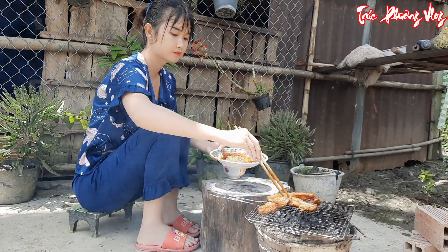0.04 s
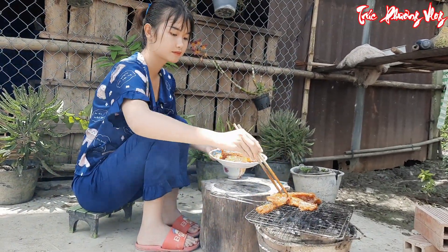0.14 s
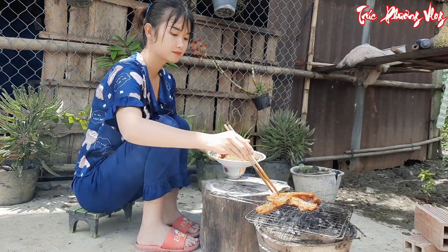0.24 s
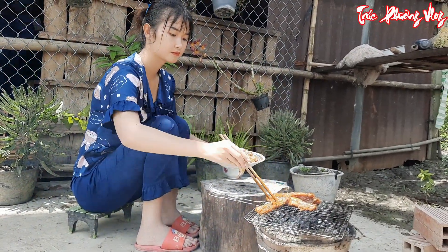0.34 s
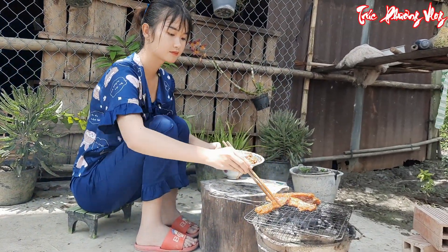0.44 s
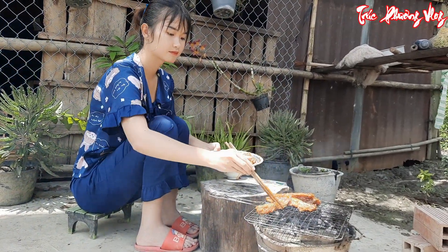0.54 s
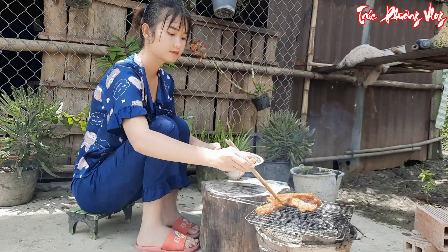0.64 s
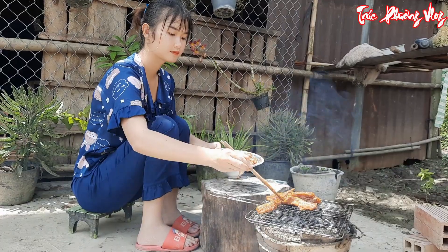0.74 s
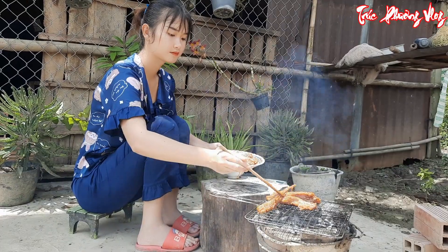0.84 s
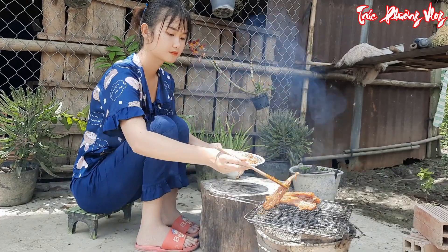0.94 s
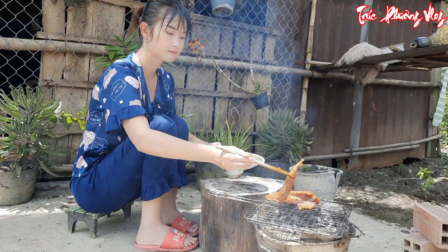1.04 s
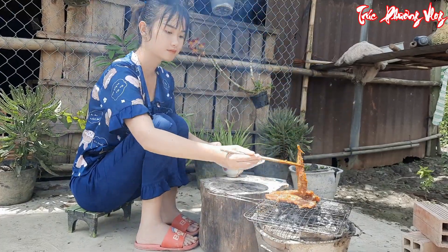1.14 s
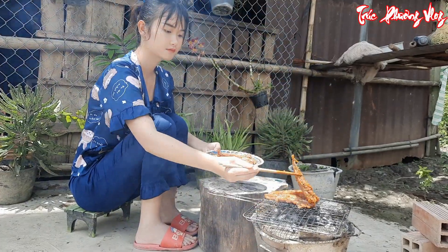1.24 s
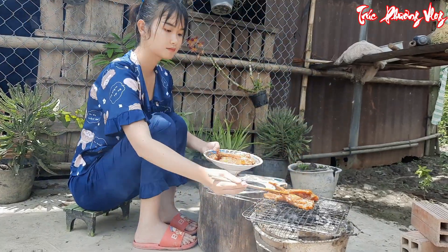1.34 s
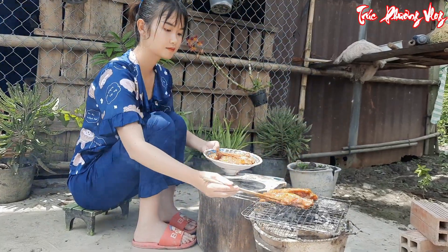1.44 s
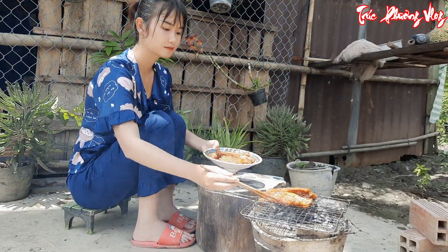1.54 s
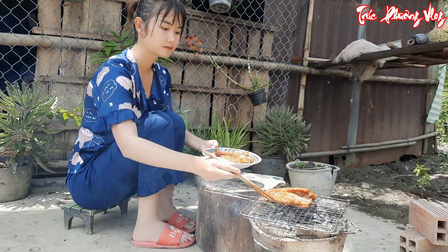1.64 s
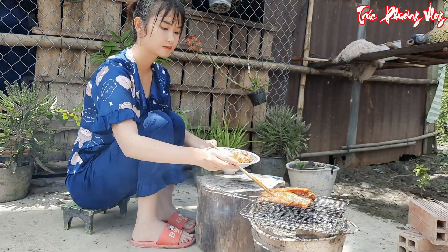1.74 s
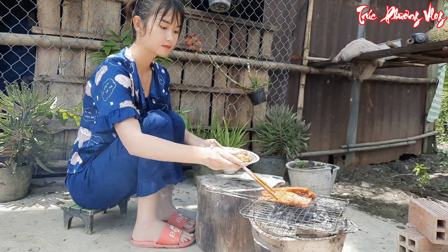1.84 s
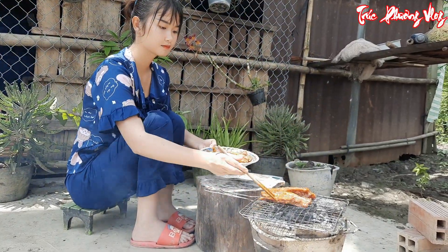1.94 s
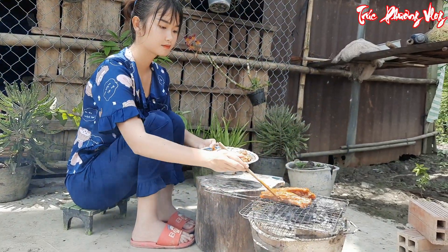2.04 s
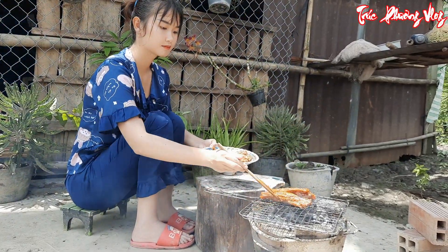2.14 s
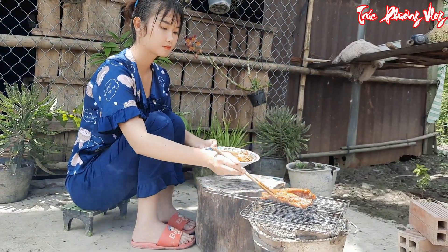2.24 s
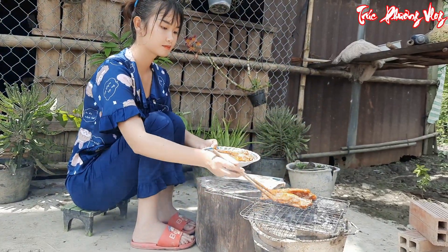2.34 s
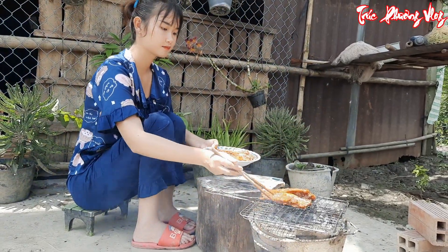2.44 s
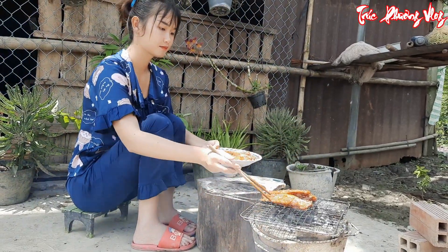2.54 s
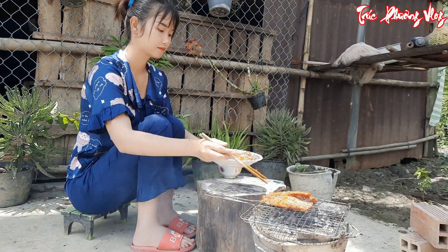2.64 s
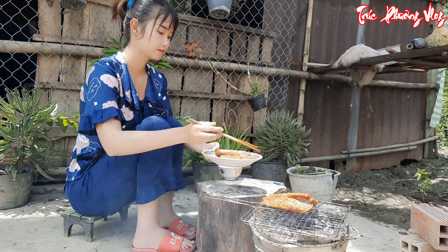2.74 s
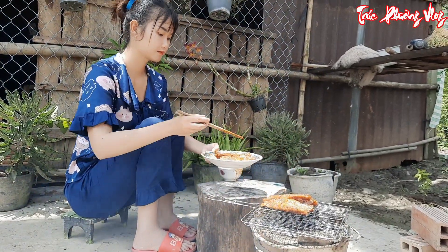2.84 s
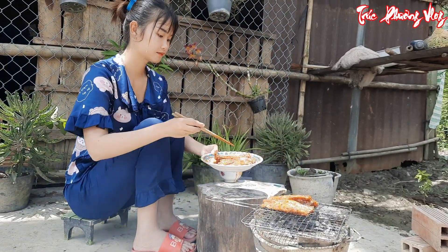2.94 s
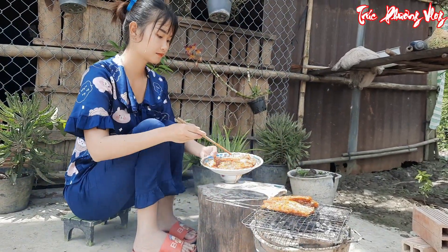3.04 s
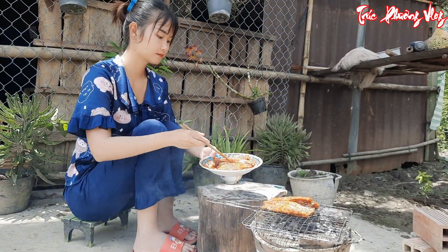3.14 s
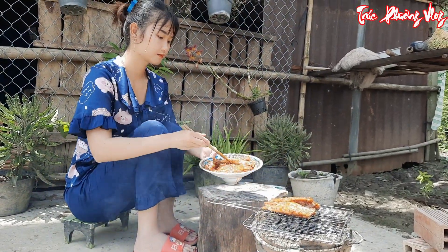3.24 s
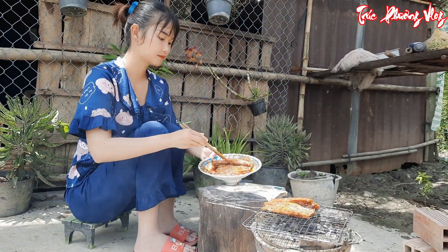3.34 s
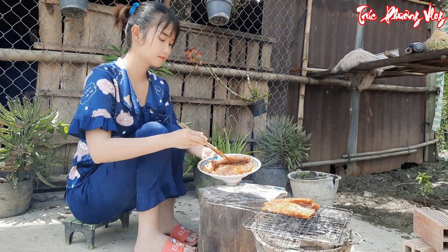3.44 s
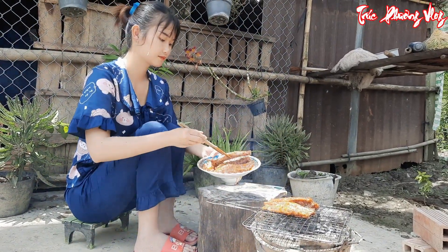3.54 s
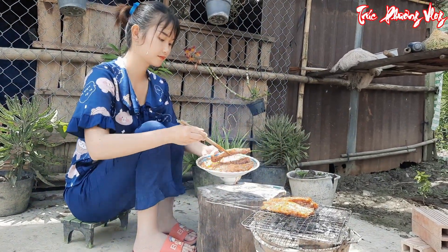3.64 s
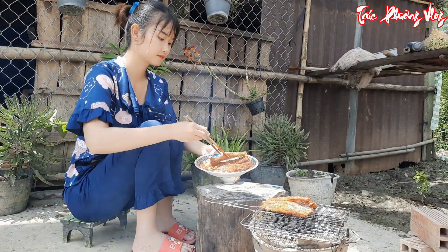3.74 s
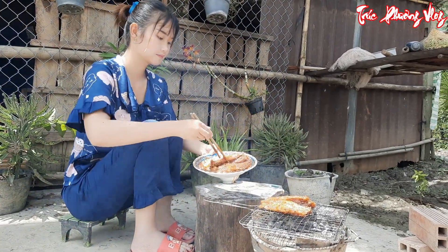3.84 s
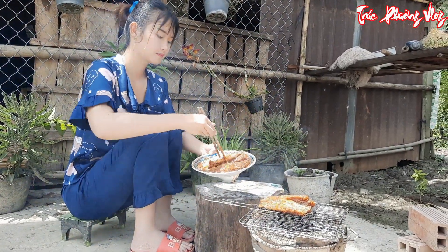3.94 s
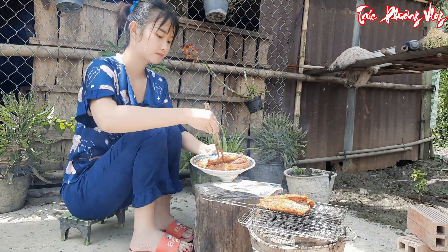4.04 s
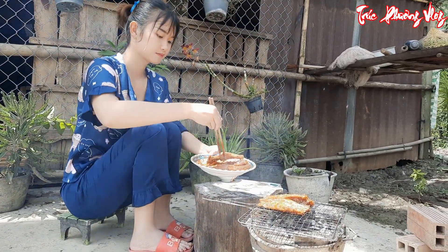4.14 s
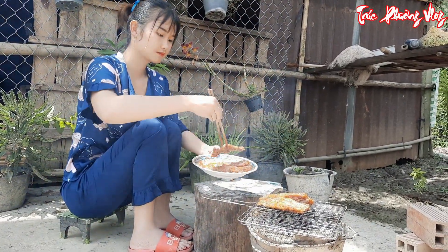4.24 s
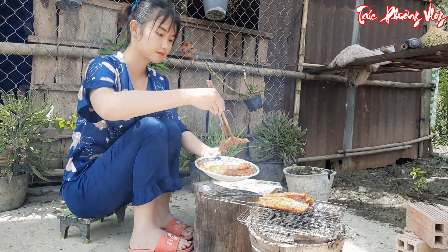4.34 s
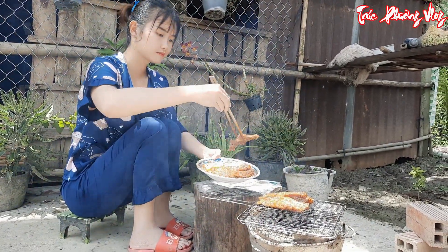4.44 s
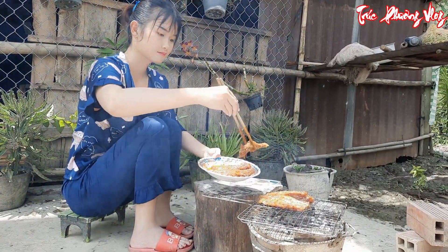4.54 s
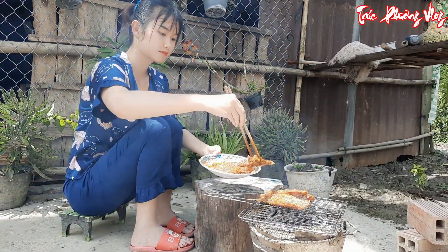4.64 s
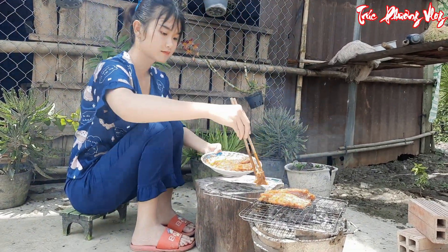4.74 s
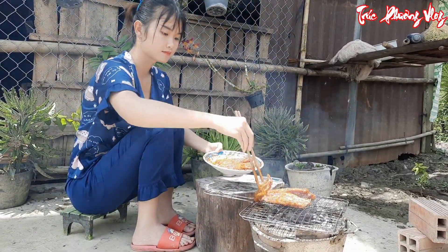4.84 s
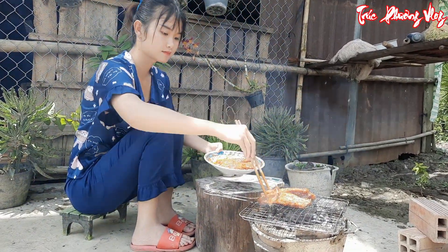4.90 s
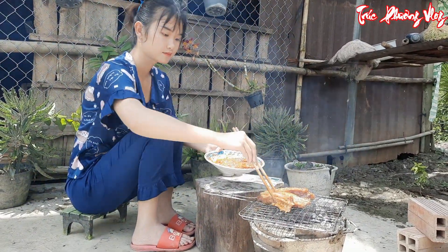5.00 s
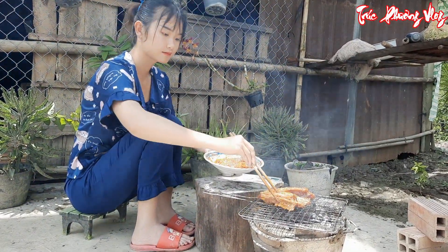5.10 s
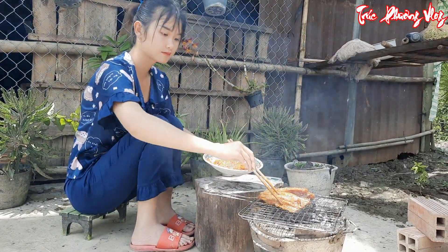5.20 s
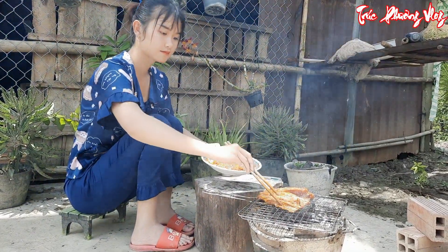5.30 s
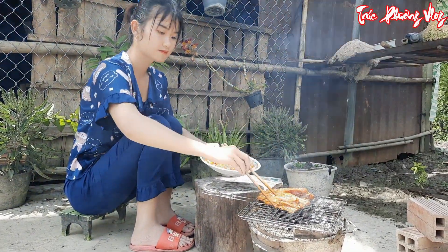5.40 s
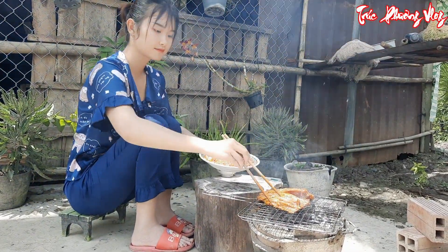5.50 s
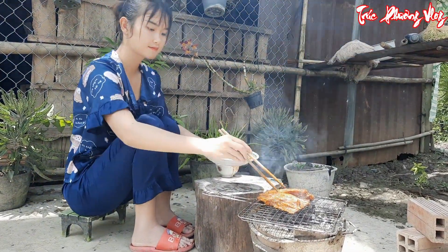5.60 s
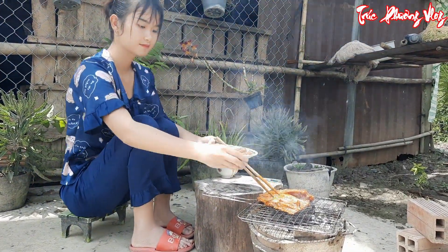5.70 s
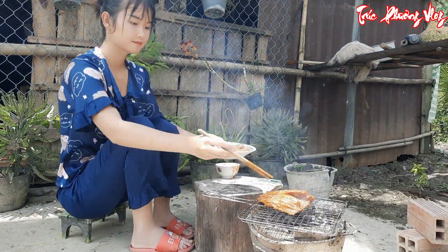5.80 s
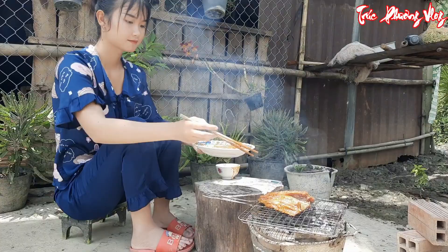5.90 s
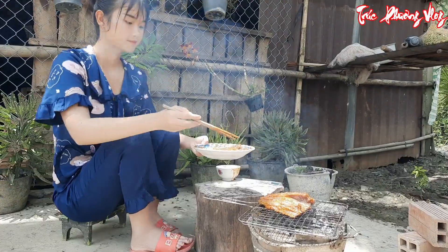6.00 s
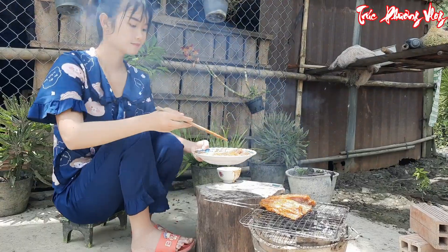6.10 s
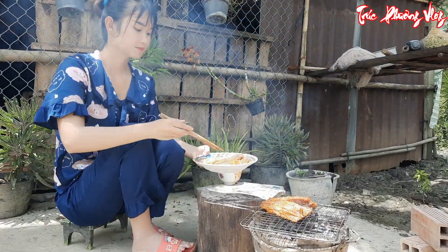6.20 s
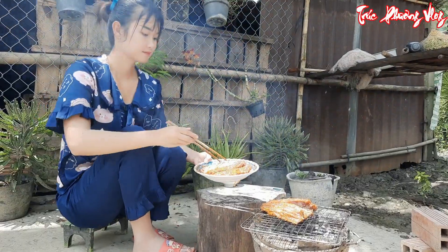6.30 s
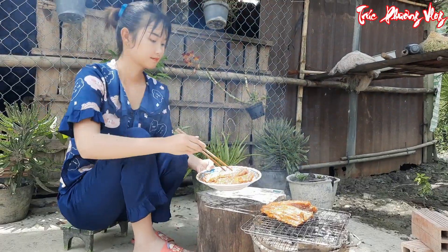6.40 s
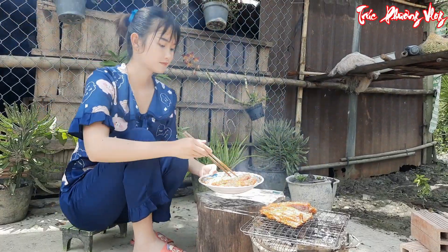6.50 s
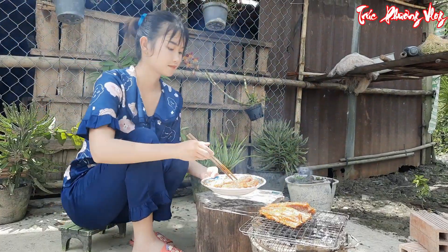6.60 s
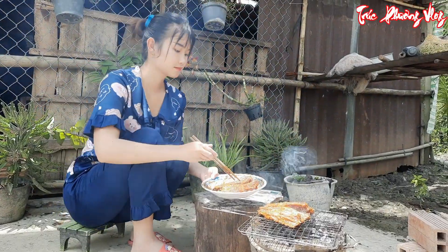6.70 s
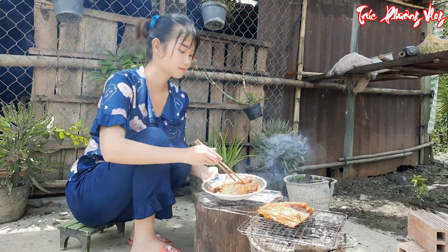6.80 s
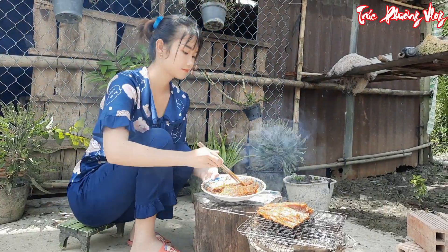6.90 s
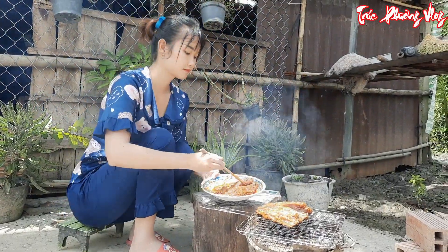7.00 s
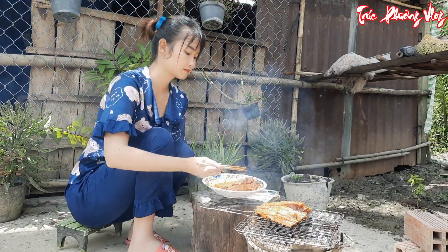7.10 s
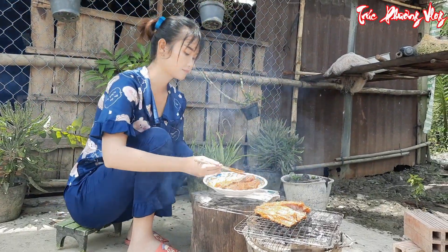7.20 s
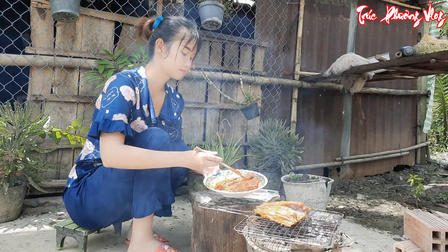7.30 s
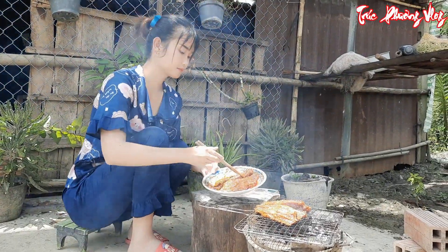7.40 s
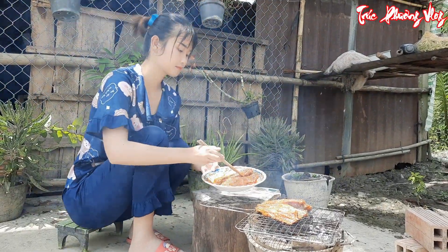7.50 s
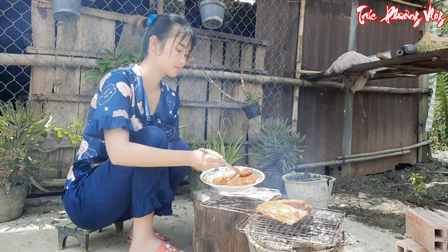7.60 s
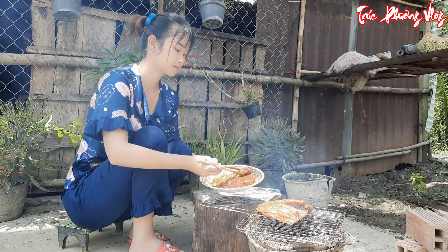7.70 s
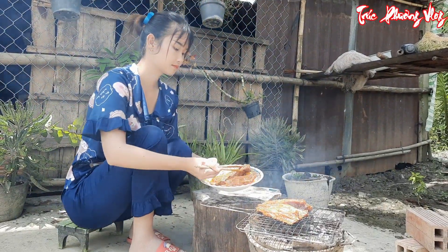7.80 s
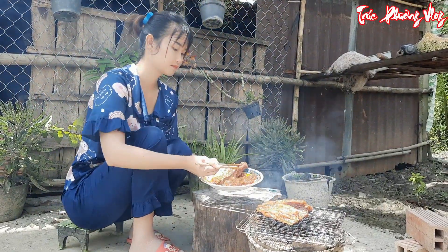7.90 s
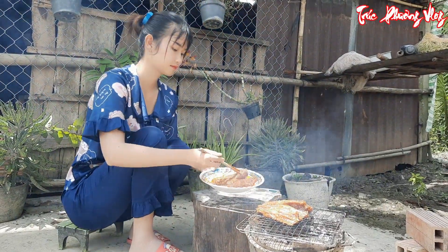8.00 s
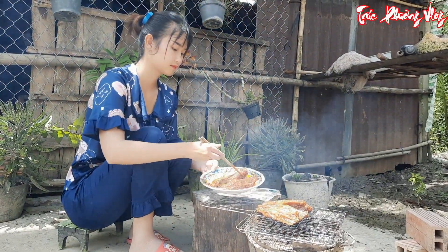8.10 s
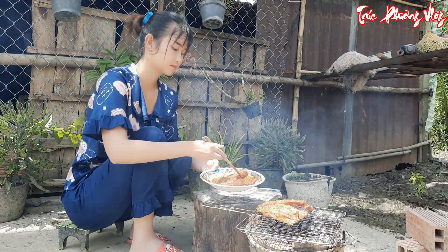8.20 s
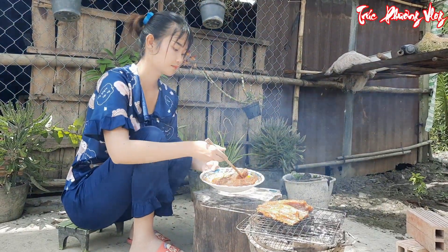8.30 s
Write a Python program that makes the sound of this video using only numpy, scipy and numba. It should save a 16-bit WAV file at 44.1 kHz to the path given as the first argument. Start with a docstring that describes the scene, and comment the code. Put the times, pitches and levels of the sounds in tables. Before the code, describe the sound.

Outdoors in a yard, grilled fish sizzles on a wire rack over charcoal, heard from a few steps away in stereo. At first the hiss is thin, with faint crackles, a low distant rumble, a faint wavering hum and a wind thump on the right around 0.6 s. At 1.4 s the sizzle jumps brighter, with pops clustered at 1.8 and a stronger snap at 2.2. From 2.5 to 4 s it stays moderate, with small spits and faint bowl taps; a bright crack lands at 4.3. Around 5.2 s the sizzle surges, rough and full, with thick popping until 5.9. A steamy scrape at 6.0 leads into a quick clatter of chopsticks on the bowl at 6.2. The hiss swells again at 6.4, pops snap until 6.9, then it thins. A very short, loud, hard clink strikes at 7.5, followed by soft knocks and a quieter sizzle.

```python
"""Fish sizzles on a wire grill over charcoal in a yard, a few steps from a phone's two microphone ports.
Boiling juice is noise under dense random bursts, spitting fat is sharp cracks with an echo and a fizz,
and steam puffs and scrapes swell a rougher, lower noise. Chopstick taps on a bowl and a few low rustles
are filtered thuds with ringing modes and a low knock. Distant rumble and a faint wavering hum, both
shaped noise, lie underneath, and low noise swells as gusts buffet mostly the right port."""
import sys
import numpy as np
from scipy import signal
from scipy.fft import rfft, irfft, next_fast_len
from scipy.io import wavfile
from scipy.ndimage import uniform_filter1d
from numba import njit

SR = 44100
rng = np.random.default_rng(int(sys.argv[2]) if len(sys.argv) > 2 else 0)


def dump_mix(stems):
    """Bounce the given channels to the path in sys.argv[1] as a 16-bit WAV at rate SR."""
    frames = np.atleast_2d(stems).T  # one column per channel
    limited = np.clip(frames, -1, 1)  # hard clip at full scale
    pcm = np.round(limited * 32767).astype(np.int16)
    wavfile.write(sys.argv[1], SR, pcm)


N = 368235

# A wavering hum in the yard: [t/s, level/dB]
HUM_CURVE = [(0, -76), (.68, -55.5), (1.31, -54), (1.43, -63), (1.65, -50), (1.91, -63), (2.02, -54.5),
             (2.5, -68), (2.98, -61), (3.2, -64)]
# Distant rumble and breeze: [t/s, rumble level/dB, breeze level before the port split/dB]
YARD_CURVE = [(0, -49.5, -62), (.74, -48.5, -62), (1.09, -50, -60), (2.67, -50, -58), (3.3, -50.5, -60),
              (3.88, -47.5, -58), (4.35, -51.5, -56.5), (5.2, -48, -61), (6.9, -46, -58),
              (7.6, -49.5, -61.5), (8.35, -51, -64)]
# Rumble spectrum: [f/Hz, density/dB per Hz]
RUMBLE_COLOUR = [(20, -43), (35, -23), (60, -7), (97, 1), (130, -4), (160, -5.5), (225, -14.5),
                 (270, -10.5), (312, -5.5), (350, -11), (420, -16.5), (550, -18.5), (860, -21.5),
                 (2100, -28), (3900, -50.5)]
# Buffets of wind: [peak t/s, rise/s, fall/s, level before the port split/dB]
WIND_GUSTS = [(.482, 0.015, .07, -45.5), (.638, 0.015, 0.029, -26.5), (1.796, .02, .035, -38.5),
              (1.97, 0.037, 0.036, -37), (2.192, 0.023, .01, -41.5), (5.022, 0.05, .025, -36),
              (5.5, .01, .05, -52)]
# Wind spectrum at the ports: [f/Hz, density/dB per Hz]
WIND_COLOUR = [(12, -26), (20, -36), (53, 6), (86, 0.5), (109, -6.5), (200, -26), (260, -54), (440, -120)]
# Chopstick taps on a bowl, and a few low rustles: [t/s, thud peak level/dB, thud pitch f/Hz,
# bowl ring re thud/dB, low knock re thud/dB, thud decay t60/s, left minus right/dB, band width/share of pitch]
TAPS_AND_RUSTLES = [(.559, -37.5, 1220, -2, -8, 0.058, 3, 0.52), (0.829, -44, 1600, -11, -12, .05, 2, 0.9),
                    (.86, -44.5, 700, -20, -14, 0.22, 2, 1.1),
                    (0.912, -39.5, 510, -12, -18, 0.072, -6, 1.2),
                    (1.42, -43, 630, -20, -20, 0.41, 4, 0.65), (2.009, -38.5, 604, -18, -21, 0.33, 1, .5),
                    (2.04, -39, 596, 3, -20, 0.13, 3, 0.53), (2.076, -39.5, 1830, -14, -9, 0.088, 11, 0.26),
                    (2.571, -32, 2430, -2, -32, .05, 3, 0.29), (3.073, -39, 2590, -5, -9, 0.031, -4, 1.2),
                    (4.008, -41.5, 430, -12, 1, 0.054, 2, 0.37), (6.163, -31, 247, -3, -13, 0.1, 0, 0.77),
                    (6.185, -25, 490, -18, -12, 0.025, 4, 0.91),
                    (6.194, -21, 2830, -1, -11, 0.037, -2, 0.31),
                    (6.21, -16, 525, -21, -12.5, 0.015, 4, 0.76),
                    (6.219, -24.5, 308, -8, -27, 0.11, 4, 1.9),
                    (6.571, -31, 1520, -7, -11, 0.072, -2, 0.36),
                    (6.9332, -26.5, 2420, 0, -15, 0.015, 3, 0.38),
                    (7.514, -7.5, 2440, -2.5, -26, 0.019, 3, 0.2), (7.925, -37, 670, -20, -2, 0.1, 7, 0.27),
                    (7.926, -39, 1590, -20, 9, 0.04, -1, 0.2),
                    (8.05, -38.5, 1340, -20, -32, 0.033, 5, 0.11)]
# Modes of the bowl: [f/Hz, level/dB, t60/s]
BOWL_MODES = [(814, -2.5, 0.06), (1125, -1, 0.038), (2000, -17, 0.057), (2167, 5, 0.079), (2260, -4, 0.095),
              (2670, -13, 0.091), (3160, -3.5, 0.087), (3420, 2.5, 0.043), (4780, -13, .025)]
# Spitting fat: [t/s, crack level/dB, treble lift/dB, left minus right/dB]
FAT_POPS = [(0.054, -39.5, -5, 4), (0.1013, -34, 4, 1), (0.162, -44, 1, 9), (0.189, -42, 0, 6),
            (0.5592, -34, -3, 4), (0.563, -30, -3, -2), (0.8328, -46, 5, 11), (0.917, -42.5, -5, 10),
            (0.9495, -39.5, -2, 3), (1.0801, -48, -3, -1), (1.791, -29, 0, -2), (1.7935, -32, 1, 0),
            (1.8035, -33, -2, -2), (1.853, -28, -5, 0), (1.8613, -36, -5, 7), (1.978, -34, 1, 9),
            (2.075, -35, 2, 5), (2.1833, -20.5, -1, -4), (2.1866, -29, 8, 4), (2.4488, -40, -6, 0),
            (2.594, -27, -1, -3), (2.6031, -29, 1, 1), (2.608, -35, -4, -6), (2.6214, -33.5, -6, -2),
            (2.663, -26, 0, -1), (2.7707, -38, 10, 5), (2.8645, -42, -12, -1), (2.877, -41, -13, -4),
            (2.9148, -33, 0, 0), (2.9208, -41, -3, 2), (2.9434, -34, 2, 1), (2.9918, -37, -1, 1),
            (3.0744, -27, -3, 0), (3.172, -37, 3, 11), (3.199, -37, 0, 9), (3.3077, -31.5, -3, 2),
            (3.3933, -44, 5, 2), (3.499, -42, 7, 4), (4.08, -34.5, 0, 3), (4.1825, -33.5, 1, 2),
            (4.2612, -35, 0, 1), (4.2643, -20.5, 9, 3.5), (4.2717, -30.5, 4, 3), (4.2927, -36, 1, 3),
            (4.482, -38, 3, 0), (4.5296, -30.5, -2, 3), (4.9386, -37, -9, 2), (5.1426, -36, -7, -11),
            (5.4024, -32, 2, -5), (5.428, -28, -5, 5), (5.45, -30, 8, 5), (5.462, -27, 2, 1),
            (5.528, -25, -2, 2), (5.538, -27, 2, 2), (5.5532, -25, -5, -6), (5.573, -29, 3, 3),
            (5.7172, -27, -3, -5), (5.7608, -18, -2, -2), (5.801, -25.5, -11, -3), (5.862, -25, 2, -1),
            (5.881, -28, 5, 3), (5.9066, -30, 1, 1), (6.104, -31, 4, 9), (6.163, -24.5, -18, -2),
            (6.21, -33, -10, -1), (6.523, -26.5, 0, 1), (6.592, -37, 2, 2), (6.752, -24, -1.5, -2),
            (6.899, -24, 0, 1), (6.9238, -19, 5.5, 4), (7.3357, -35, 7, 3), (7.371, -34, 1, 3),
            (7.4232, -37, 7, 8), (7.4972, -34.5, -4, 7), (7.5172, -28, -19, -7), (7.618, -36.5, 6, 7),
            (7.791, -31, -6, -1), (7.9357, -39.5, 0, 13)]
# Pop spectrum: [f/Hz, density/dB per Hz]
CRACK_COLOUR = [(1500, -44), (2600, -13.5), (4000, -1.5), (5000, 2.5), (8800, -1.5), (11100, 2.5),
                (15000, 4), (17000, -26)]
# Steam puffs and scrapes: [peak t/s, rise/s, fall/s, rasp level/dB, hiss level/dB,
# rasp centre f/Hz, share of rasp power in the narrow core/0-1]
STEAM_PUFFS = [(.082, 0.054, .1, -69, -57, 2500, 0.4), (.391, .04, 0.17, -54, -55, 2850, .55),
               (.573, .015, .04, -47.5, -49, 2050, 0), (.856, 0.031, 0.065, -53.5, -77, 1900, .4),
               (1.461, 0.026, 0.17, -44.5, -47, 2760, 0.1), (1.736, 0.11, 0.21, -44, -52, 2600, 0.4),
               (2.093, 0.099, 0.056, -48, -60, 2110, 0.05), (2.201, 0.036, .12, -46.5, -43, 2820, 0.34),
               (2.464, 0.016, 0.1, -46, -47.5, 2620, 0.1), (2.596, 0.026, 0.066, -43.5, -43, 2500, 0.07),
               (2.812, 0.11, 0.078, -47, -75, 2200, .65), (3.088, 0.011, 0.034, -43.5, -42, 2740, 0.5),
               (3.179, 0.023, 0.042, -64, -44.5, 2400, .5), (3.3, .05, 0.066, -58, -68, 2200, 0),
               (3.975, 0.024, 0.065, -57, -49, 2560, 1), (4.103, 0.04, 0.027, -52, -47, 2450, .5),
               (4.282, 0.018, 0.11, -58, -52, 2840, 0.4), (4.623, .03, 0.046, -45.5, -43.5, 2420, 0.5),
               (4.75, 0.069, 0.073, -53, -59, 2900, 1), (5.007, 0.064, .06, -47, -42.5, 2760, 0.6),
               (5.16, .04, 0.053, -41.5, -49, 2770, 0.5), (5.59, 0.18, 0.013, -36.5, -46, 2700, 0),
               (5.997, 0.0073, 0.073, -32.5, -31.5, 2360, 0.25),
               (6.044, 0.03, 0.024, -34.5, -37, 2250, 0.47), (6.163, .003, .025, -31, -35, 2800, 0.16),
               (6.209, .03, 0.02, -34.5, -34, 1970, 0.8), (6.591, .04, 0.041, -40.5, -62, 2070, 0),
               (6.936, 0.0036, .05, -42, -53, 2500, 0.7), (7.55, 0.031, 0.027, -37.5, -50, 2410, 0.1),
               (7.687, 0.071, 0.081, -51, -59, 2620, 1), (7.82, .03, 0.072, -49, -51, 2610, 0.8),
               (7.93, .008, .02, -44, -48, 2400, .1), (7.96, .025, 0.046, -44.5, -56, 2770, 0.8),
               (8.07, 0.037, 0.14, -47.5, -61, 2500, 0.3)]
# Rasp spectrum: [f/Hz, density/dB per Hz]
RASP_SPECTRUM = [(290, -47), (500, -5.5), (764, -12.5), (833, -6), (1440, 0.5), (1640, 3.5), (3570, 1),
                 (5000, -3), (6500, -58), (11000, -120)]
# The steady sizzle: [t/s, hiss level/dB, treble lift/dB, rasp level/dB]
SIZZLE_CURVE = [(0, -48.5, -1.5, -60), (.43, -44.5, -3, -60.5), (.88, -46.5, -3.5, -56.5),
                (1.2, -50.5, -3, -65.5), (1.396, -49.5, -6, -59), (1.411, -38.5, 3.5, -58),
                (1.46, -36.5, 3, -55), (1.68, -34.5, -4, -57), (1.96, -40, -1, -65),
                (2.4, -44.5, -3, -54.5), (2.9, -39, -5, -54), (3.05, -43, -3, -59), (3.56, -42, -3.5, -63),
                (3.7, -37, 0.5, -58), (3.95, -42.5, 0, -60), (4.5, -42.5, -5.5, -58.5), (4.9, -41, 1, -57),
                (5.19, -34.5, -2.5, -52), (5.26, -27, -5, -42), (5.48, -26, -1.5, -39.5),
                (5.82, -27, -5, -40.5), (5.96, -32, -2, -47), (6.355, -33.5, -4.5, -46.5),
                (6.385, -28, 0, -41.5), (6.63, -34.5, -2.5, -47.5), (7.35, -35, -3.5, -52.5),
                (7.6, -40, -4, -54), (7.92, -40.5, -4, -53.5), (8.0, -44.5, -3.5, -64),
                (8.35, -42, -3, -56)]
# Hiss spectrum: [f/Hz, density/dB per Hz]
SIZZLE_COLOUR = [(1470, -50.5), (2500, -23), (3330, -1), (3600, -13.5), (3980, -2.5), (4730, -1), (6500, 0),
                 (9150, -3), (11100, 3), (13600, 2.5), (14900, 5), (15600, 8.5), (16000, -58)]
# Tone balance of the ports: [f/Hz, left minus right level/dB]
LEFT_RIGHT_BALANCE = [(60, 1.5), (200, 0.5), (400, 3.5), (900, 2), (1600, 7), (2600, -1.5), (4400, -3.5),
                      (6000, 0.5), (8500, 0), (11000, 11.5), (15000, -0.5)]
# Phase between the ports: [f/Hz, lead of the left/rad]
LEFT_RIGHT_PHASE = [(200, 0), (1640, -1.5), (3010, -2), (3900, -7.5), (8200, -5), (10000, -8)]
# Power share the ports have in common: [f/Hz, share/0-1]
LEFT_RIGHT_LIKENESS = [(60, 1), (150, 0.83), (500, 0.5), (1500, 0.79), (3000, 0.32), (4500, 0.58),
                       (6500, 0.34), (9000, 0), (15000, 0.3)]

TOP_HZ, BRIGHT_HZ = 16800, 9200  # upper limit of the sound; where the treble lift sets in
SIZE = next_fast_len(N + 4096)  # FFT length in samples, padded for filter tails
HZ = np.maximum(np.arange(SIZE // 2 + 1) * SR / SIZE, 1)  # bin frequencies
HUM_HZ = 151.9
KNOCK_HZ, KNOCK_T60 = 346, 0.11  # Hz, s
GUST_SHAPE, PUFF_SHAPE = 1.35, 1.4  # exponents: higher is rounder at the top
BED_HZ, BED_CORE = 2570, 0.18  # rasp centre in Hz and core share between puffs
STEAM_TOP_DB = -11.5  # steam is duller than the sizzle
FIZZ_OVER_HISS_DB = -2  # a pop's fizz relative to the sizzle around it


def undb(db):
    """Decibels to gain."""
    return 10 ** (np.asarray(db) / 20)


def over_hz(table):
    """A table of values against frequency, read at every bin on a log scale."""
    hz, value = np.transpose(table)
    return np.interp(np.log(HZ), np.log(np.maximum(hz, 1)), value)


def over_time(table):
    """The columns of a curve read at every sample."""
    s, *columns = np.transpose(table)
    return [np.interp(np.arange(N) / SR, s, c) for c in columns]


def unit(x):
    """Scaled to rms 1."""
    return x / np.sqrt(np.mean(x ** 2))


def colour(x, table):
    """Causal filter from the cepstrum of a spectrum; white noise keeps its power."""
    magnitude = unit(undb(np.maximum(over_hz(table), -90)))
    cepstrum = irfft(np.log(magnitude), SIZE)
    # folding the cepstrum onto positive time gives minimum phase
    cepstrum[1:SIZE // 2] *= 2
    cepstrum[SIZE // 2 + 1:] = 0
    response = np.exp(rfft(cepstrum))
    return irfft(rfft(x, SIZE) * response, SIZE)[..., :N]


def brighten(x, db):
    """The treble above about BRIGHT_HZ rises or falls by db."""
    top = irfft(rfft(x, SIZE) / (1 + (BRIGHT_HZ / HZ) ** 12), SIZE)[:, :N]
    return x + (undb(db) - 1) * top


@njit
def band(x, hz, width):
    """State-variable band-pass whose centre moves; width is a share of the centre."""
    y, b, l = np.empty(len(x)), 0., 0.
    for i in range(len(x)):
        g = np.tan(np.pi * hz[i] / SR)
        v = (b + g * (x[i] - l)) / (1 + g * (g + width))
        b, l, y[i] = 2 * v - b, l + 2 * g * v, width * v
    return y


def fade(x, t60):
    """Every kick in x dies away exponentially, by 60 dB in t60 seconds."""
    return signal.lfilter([1], [1, -np.exp(-np.log(1000) / (t60 * SR))], x)


def walk(rate):
    """Random levels held 1 / rate s and slewed twice; spread near 1."""
    k = int(SR / rate)
    steps = np.repeat(rng.standard_normal(N // k + 1), k)
    return 1.3 * uniform_filter1d(uniform_filter1d(steps, k), k)[:N]


def swells(rows, shape):
    """One rise and fall to a top of 1 for each leading (peak t/s, rise/s, fall/s); rows x samples."""
    out = np.zeros((len(rows), N))
    for env, (s, rise, fall) in zip(out, np.array(rows)[:, :3]):
        a, b = max(int((s - .4) * SR), 0), min(int((s + .6) * SR), N)
        t = np.arange(a, b) / SR - s
        span = np.where(t < 0, max(rise, .001), max(fall, .001))
        env[a:b] = np.exp(-(np.abs(t) / span) ** shape)
    return out


def bursts(per_s, spread_db, t60, bed):
    """Envelope of bubbles that burst at random, a few much larger than the rest, over an even bed."""
    when = rng.random(N) < per_s / SR
    size = np.minimum(rng.exponential(size=N), 2.8)
    return unit(bed + unit(fade(when * undb(spread_db * size), t60)))


def ports(envelope):
    """Noise under an envelope as two ports hear it: a shared part mixed with separate parts by frequency."""
    common, left, right = rfft(envelope * rng.standard_normal((3, N)), SIZE)
    like = np.clip(over_hz(LEFT_RIGHT_LIKENESS), 0, 1)
    turn = np.exp(.5j * over_hz(LEFT_RIGHT_PHASE))
    gain = undb(over_hz(LEFT_RIGHT_BALANCE) / 2)
    shared, apart = np.sqrt(like) * common, np.sqrt(1 - like)
    pair = [gain * (shared * turn + apart * left), (shared / turn + apart * right) / gain]
    return irfft(np.array(pair), SIZE)[:, :N]


def humming():
    """A narrow, unsteady low tone: noise through two resonances whose centre wanders."""
    hz = HUM_HZ * (1 + 0.016 * walk(1.84))
    tone = unit(band(band(rng.standard_normal(N), hz, 0.075), hz, 0.075))
    return tone * undb(over_time(HUM_CURVE)[0])


def outdoors():
    """Distant rumble wavers at both ports; breeze and gusts are low noise, mostly on the right one."""
    rumble_db, breeze_db = over_time(YARD_CURVE)
    rumble = colour(ports(undb(2.1 * walk(9.1))), RUMBLE_COLOUR) * undb(rumble_db)
    gust_level = undb(np.array(WIND_GUSTS)[:, 3]) @ swells(WIND_GUSTS, GUST_SHAPE)
    wind = colour(rng.standard_normal((2, N)), WIND_COLOUR) * (gust_level + undb(breeze_db))
    return rumble + wind * undb(np.array([[-8.], [5.]]))  # left, right


def tapping(contact=1.1, lag_s=.00008, bounce=0.18, bounce_s=0.00094):
    """Taps and low rustles: a rattling thud at its own pitch, the bowl's modes and a low knock."""
    out, t = np.zeros((2, N)), np.arange(int(.2 * SR)) / SR
    hz, mode_db, t60 = np.transpose(BOWL_MODES)[:, :, None]
    luck = rng.standard_normal((len(TAPS_AND_RUSTLES), len(BOWL_MODES) + len(t)))
    knock = np.sin(2 * np.pi * KNOCK_HZ * t) * np.exp(-np.log(1000) * t / KNOCK_T60)
    for (s, db, thud_hz, ring_db, knock_db, decay, pan, width), draw in zip(TAPS_AND_RUSTLES, luck):
        mode_luck, noise = draw[:len(BOWL_MODES), None], draw[len(BOWL_MODES):]
        # each row excites the modes a little differently
        modes = undb(mode_db + 2.1 * mode_luck) * np.sin(2 * np.pi * hz * t)
        ring = (modes * np.exp(-np.log(1000) * t / t60)).sum(0)
        # the stick chatters on the glaze and blurs the ring
        chatter = 0.089 * noise[::-1] * np.exp(-t / 0.0014)
        ring = ring + signal.fftconvolve(ring, chatter)[:len(t)]
        # the contact lasts about half a cycle of the thud, under a decaying rattle
        push = contact * (t < .5 / thud_hz) * np.sqrt(thud_hz / 500) / 3
        push = push + noise * np.exp(-np.log(1000) * t / max(decay, .004))
        pitch = np.full(len(t), 1. * thud_hz)
        thud = band(band(push, pitch, width), pitch, width)
        blow = thud / np.abs(thud).max()
        blow = blow + undb(ring_db) * ring / np.abs(ring).max() + undb(knock_db) * knock
        blow = blow * np.minimum(t / max(.0003, 0.11 / thud_hz), 1)  # low thuds start more softly
        # the right port hears it a little later, with a close reflection
        far = np.interp(t - lag_s, t, blow, left=0)
        far = far + bounce * np.interp(t - bounce_s, t, blow, left=0)
        level = undb(db + np.array([[pan], [-pan]]) / 2)
        i = int(s * SR)
        out[:, i:i + len(t)] += (level * np.array([blow, far]))[:, :N - i]
    return out


def spitting(echo_s=0.00313, echo_db=-14, fizz_t60=0.037):
    """Each pop is a sub-millisecond crack, its echo off the ground and a short fizz."""
    t = np.arange(-20, int(.04 * SR)) / SR
    crack = np.exp(-np.abs(t) / np.where(t < 0, .0001, .00025))
    echo = undb(echo_db) * np.interp(t - echo_s, t, crack, left=0)
    fizz = (t > 0) * np.exp(-np.log(1000) * t / fizz_t60)
    starts = [int(row[0] * SR) - 24 for row in FAT_POPS]
    hiss_db = over_time(SIZZLE_CURVE)[0]
    envelope, bright_db, gain_db = np.zeros(N), np.zeros(N), np.zeros((2, N))
    for i, (_, db, bright, _) in zip(starts, FAT_POPS):
        fizz_db = min(hiss_db[i] + FIZZ_OVER_HISS_DB - db, 0)  # never above its crack
        # a new pop replaces what is left of the one before
        envelope[i:i + len(t)] = (crack + echo + undb(fizz_db) * fizz)[:N - i]
        bright_db[i:] = bright
    noise = brighten(colour(ports(envelope), CRACK_COLOUR), bright_db)
    for i, (_, db, _, pan) in zip(starts, FAT_POPS):
        # level each pop by the power of its first 70 samples, mid plus a little of both sides
        onset = noise[:, i:i + 70]
        own_db = 10 * np.log10(np.mean(onset.mean(0) ** 2) + .2 * np.mean(onset ** 2))
        gain_db[:, i:] = (db - own_db + np.array([pan, -pan]) / 2)[:, None]
    return noise * undb(gain_db)


def rasping(puffing):
    """Rough noise: a core whose centre is the power-weighted mean of bed and puffs, in a broad skirt."""
    _, _, _, db, _, centre, core_share = np.transpose(STEAM_PUFFS)
    power, bed = undb(db) ** 2, undb(over_time(SIZZLE_CURVE)[2]) ** 2
    total = bed + power @ puffing
    # centre and share are averages weighted by power
    hz = (bed * BED_HZ + (power * centre) @ puffing) / total
    share = np.clip((bed * BED_CORE + (power * core_share) @ puffing) / total, 0, 1)
    grain = bursts(per_s=300.0, spread_db=2.5, t60=0.017, bed=1.77)
    rough = colour(ports(grain), RASP_SPECTRUM)
    core = unit(np.array([band(band(side, hz, 0.47), hz, 0.47) for side in rough]))
    return (np.sqrt(share) * core + np.sqrt(1 - share) * unit(rough)) * np.sqrt(total)


def frying(puffing):
    """Boiling juice: a bright hiss of short puffs and tiny sharp snaps; steam puffs swell it."""
    fry_db, bright_db, _ = over_time(SIZZLE_CURVE)
    puffs = bursts(per_s=340.0, spread_db=0.5, t60=0.014, bed=4.2)
    snaps = bursts(per_s=260., spread_db=7.5, t60=0.00071, bed=0.)
    hiss = colour(ports(unit(puffs + 0.25 * snaps)), SIZZLE_COLOUR)
    steam_power = undb(np.array(STEAM_PUFFS)[:, 4]) ** 2 @ puffing
    steam = np.sqrt(steam_power) * brighten(hiss, STEAM_TOP_DB)
    return steam + undb(fry_db) * brighten(hiss, bright_db)


def scene():
    """All sources at the two ports; hiss and rasp share the power envelopes of the puffs."""
    puffing = swells(STEAM_PUFFS, PUFF_SHAPE) ** 2
    return frying(puffing) + rasping(puffing) + spitting() + tapping() + outdoors() + humming()


def record(dry):
    """A steep low-pass closes the top."""
    return signal.sosfilt(signal.ellip(8, .2, 70, TOP_HZ, fs=SR, output="sos"), dry)


dry = scene()
out = record(dry)
dump_mix(out)
```